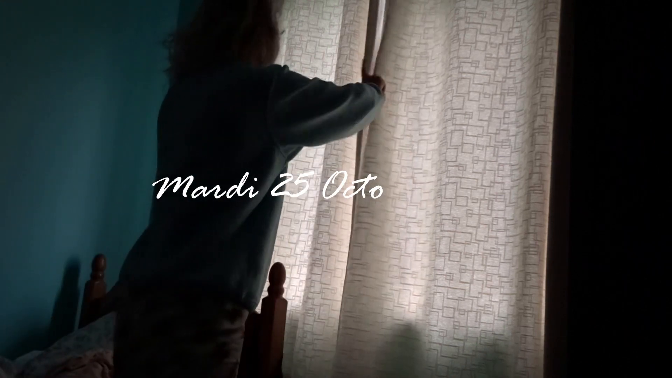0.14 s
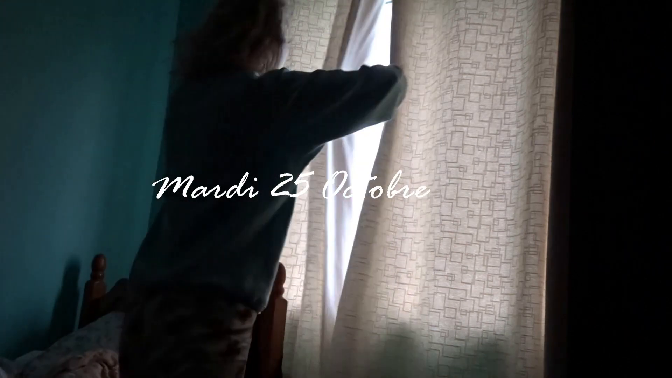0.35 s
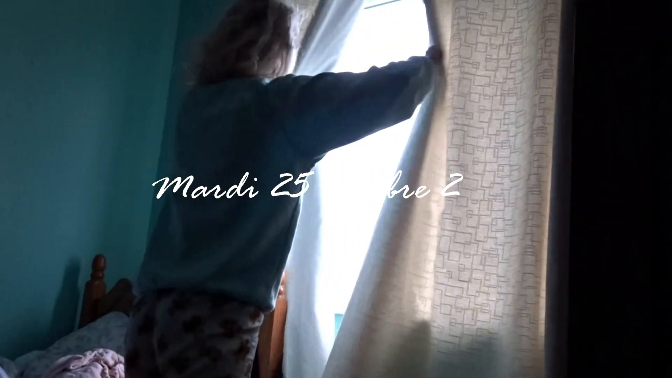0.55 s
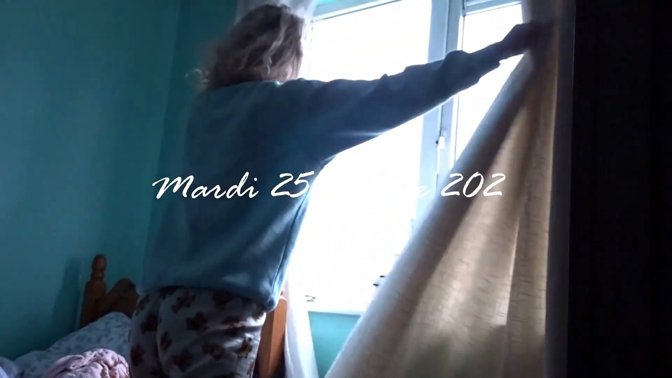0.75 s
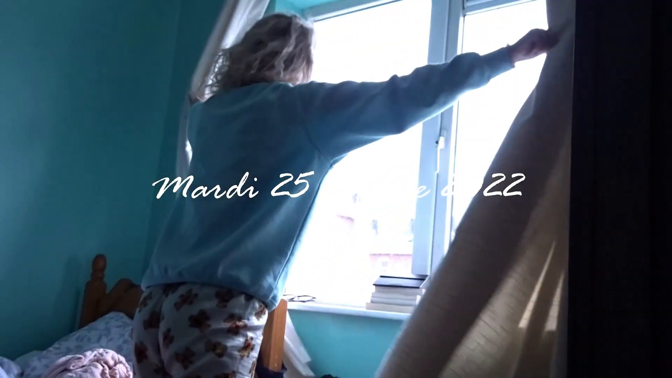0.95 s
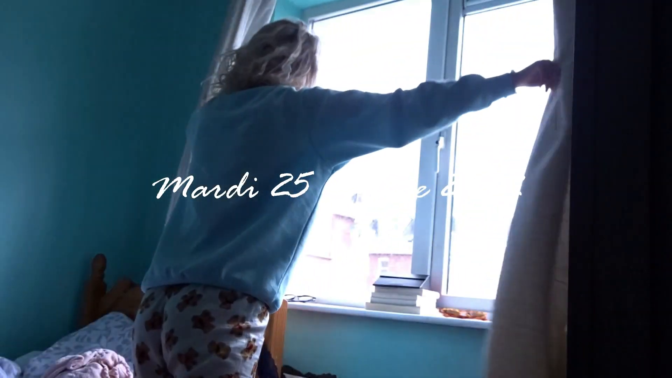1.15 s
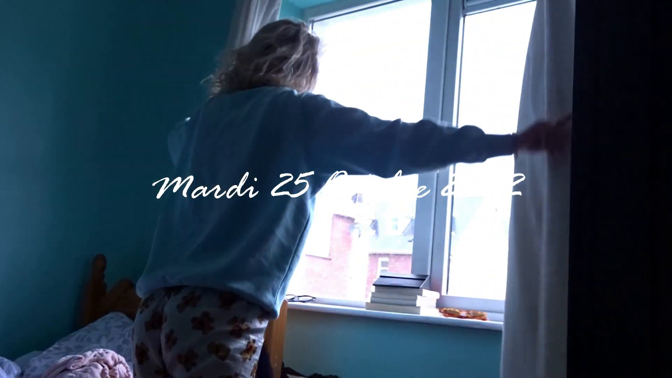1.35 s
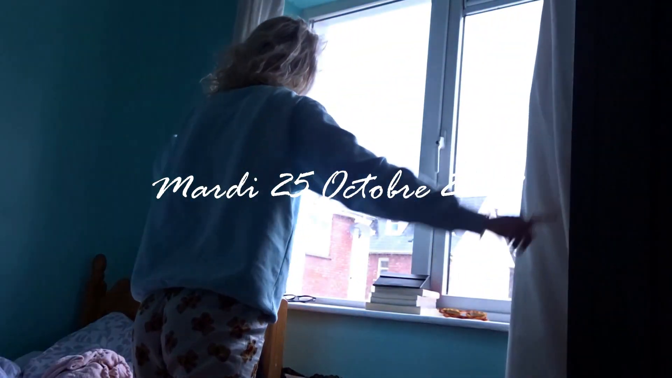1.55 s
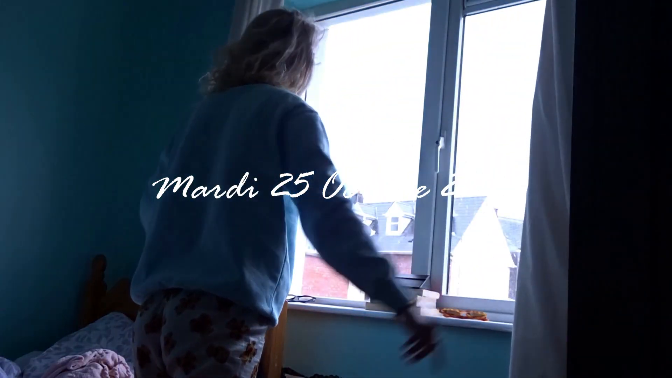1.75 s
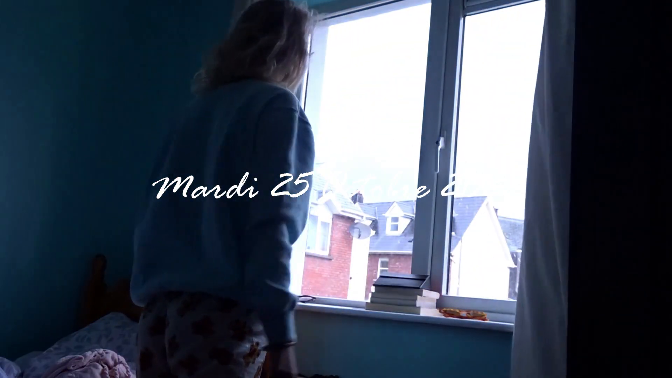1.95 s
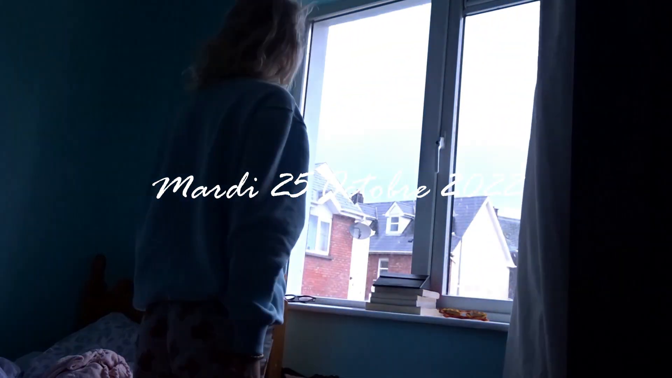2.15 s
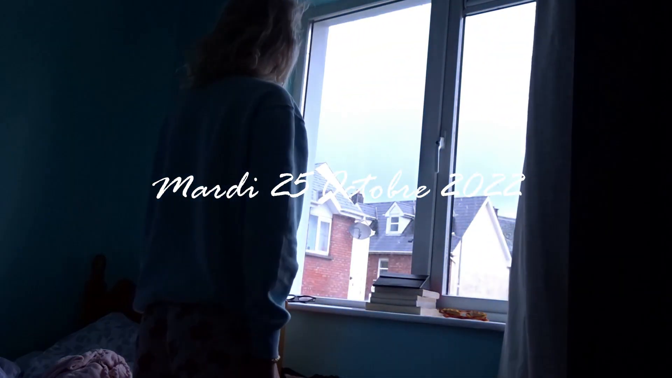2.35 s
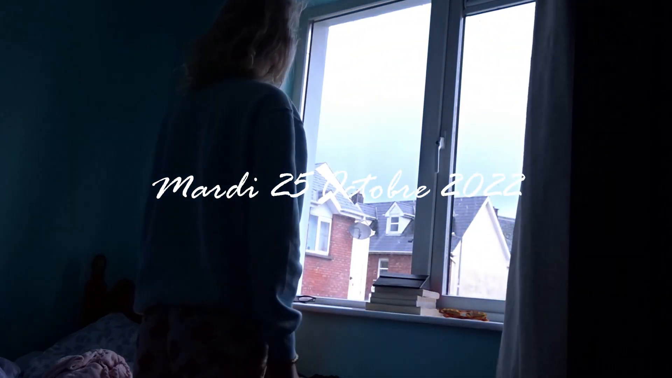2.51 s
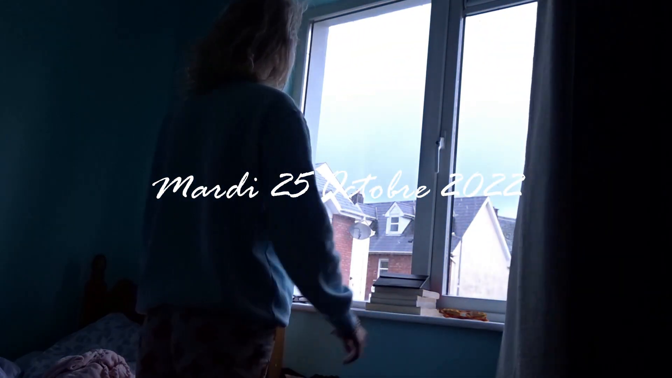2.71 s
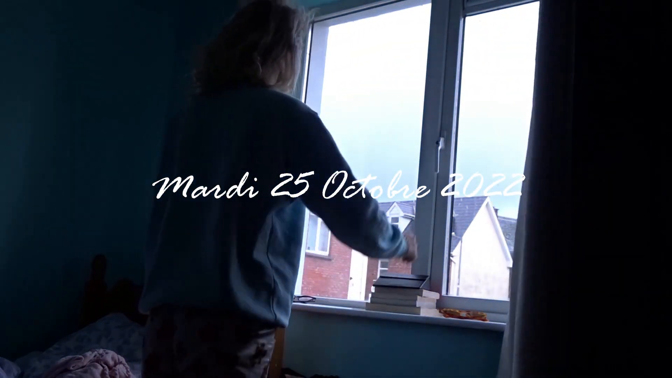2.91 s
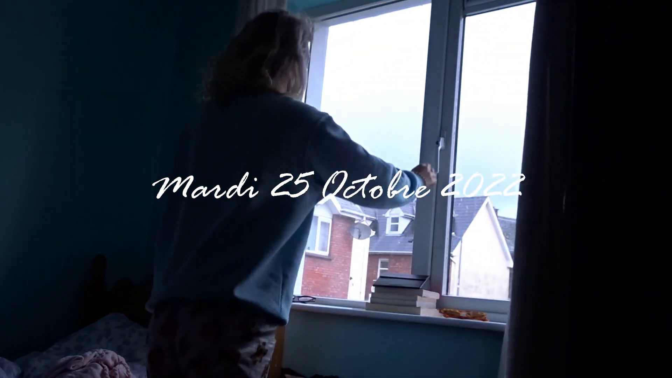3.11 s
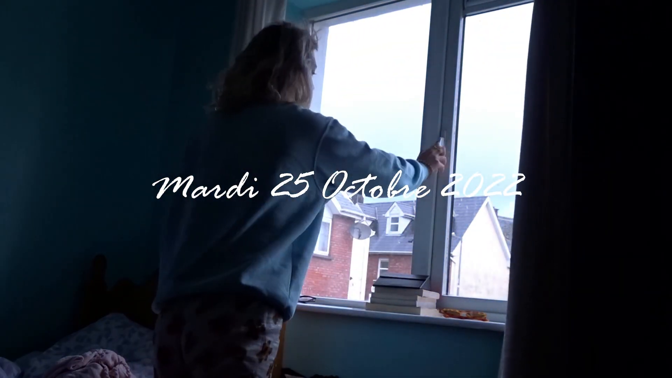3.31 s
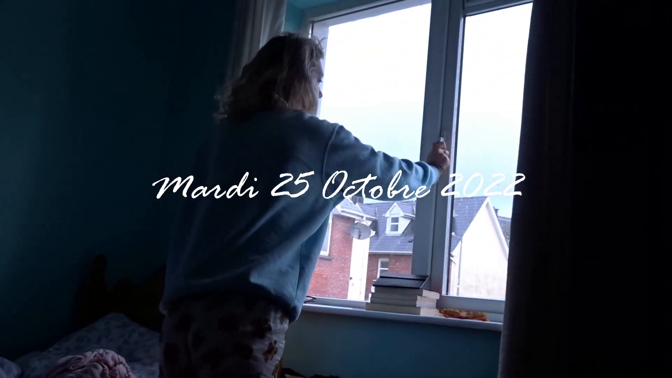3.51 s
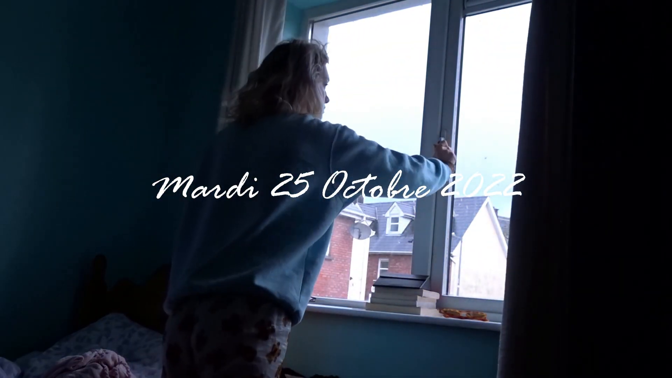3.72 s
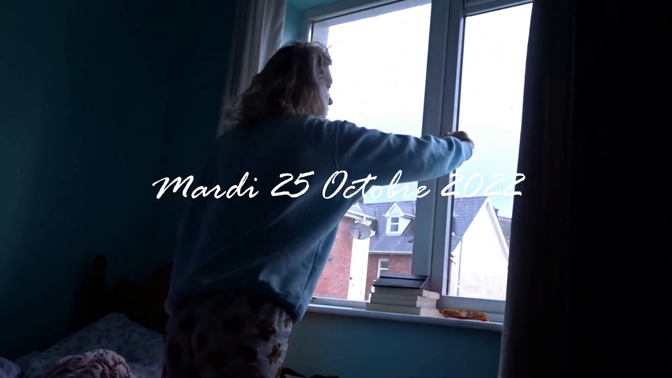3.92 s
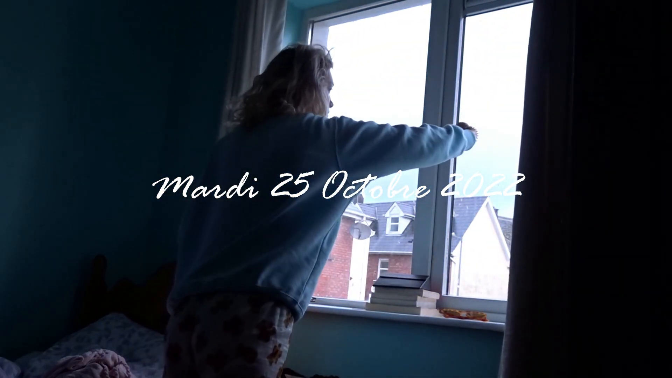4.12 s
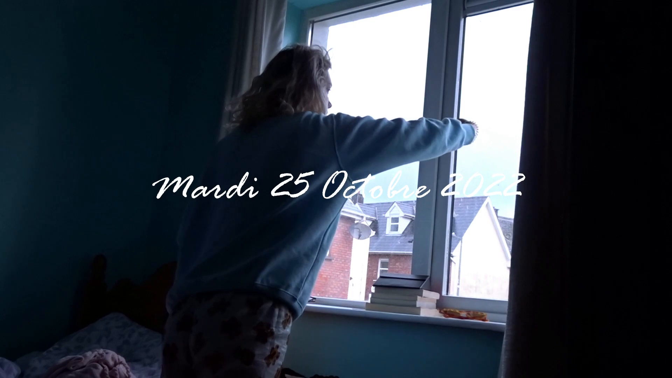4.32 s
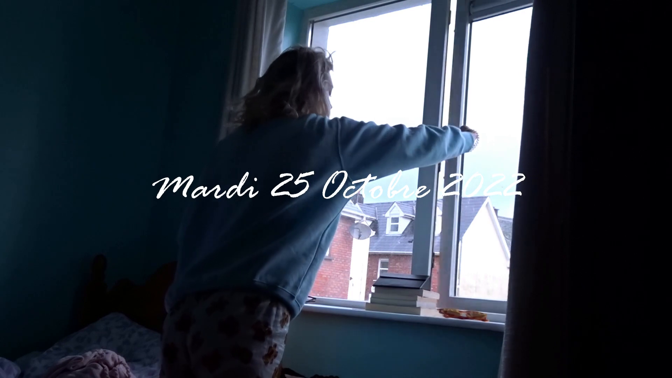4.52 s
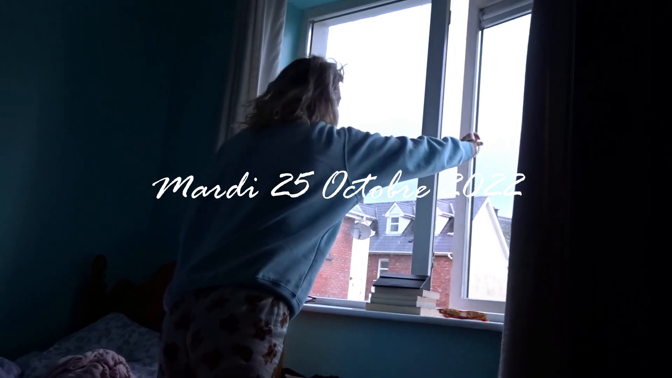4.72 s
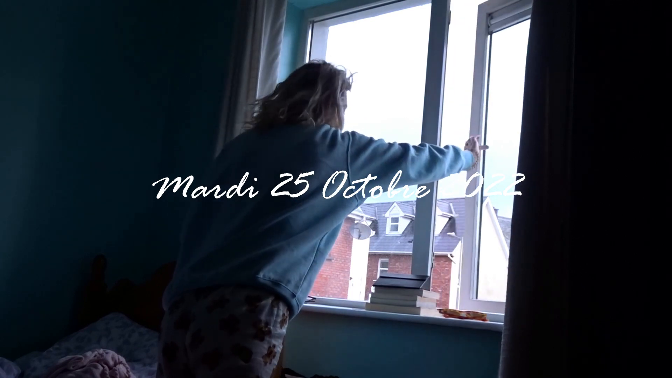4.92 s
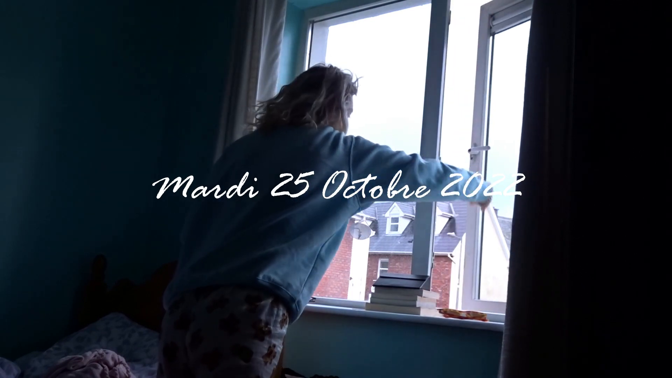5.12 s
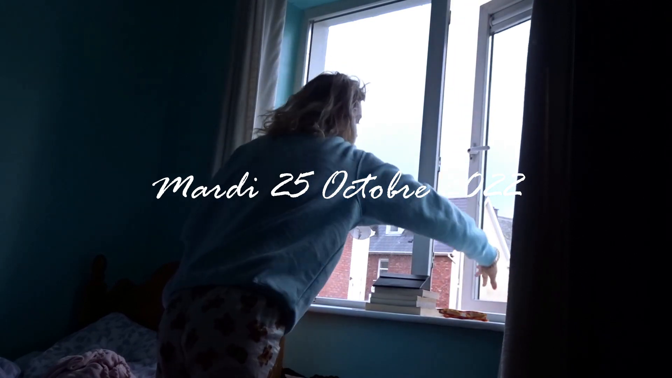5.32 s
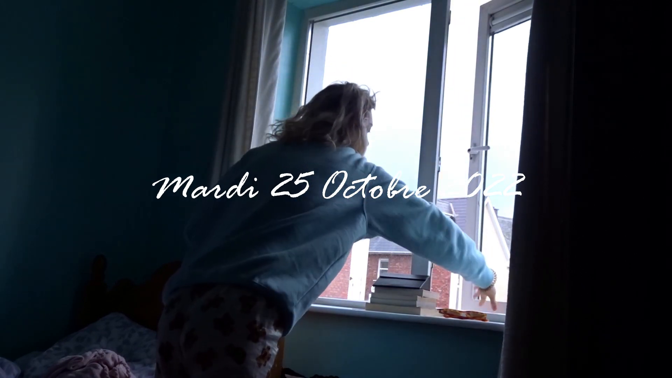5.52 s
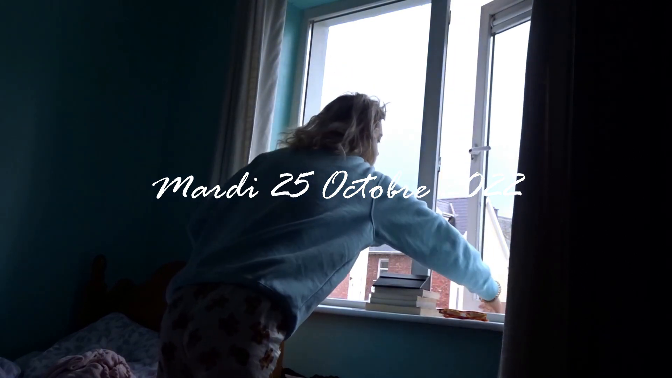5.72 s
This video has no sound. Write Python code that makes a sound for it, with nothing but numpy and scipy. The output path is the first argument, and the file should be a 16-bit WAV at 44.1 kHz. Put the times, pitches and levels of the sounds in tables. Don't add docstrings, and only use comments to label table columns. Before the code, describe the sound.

A brisk metallic rattle of curtains swept open in a quiet bedroom, followed by latch clacks, a frame thump and a short stay rasp.

```python
import sys
import numpy as np
from scipy import signal
from scipy.fft import rfft, irfft
from scipy.io import wavfile

SR = 44100
rng = np.random.default_rng(int(sys.argv[2]) if len(sys.argv) > 2 else 0)


def convert_level_to_amplitude(level_db):
    exponent = np.asarray(level_db, float) / 20
    return 10 ** exponent


def wav_out(sig):
    wavfile.write(sys.argv[1], SR, np.round(np.clip(np.atleast_2d(sig).T, -1, 1) * 32767).astype(np.int16))


N = 258110


def rms_one(x):
    return x / np.sqrt(np.mean(x ** 2) + 1e-20)


def in_time(rows):
    s, *columns = np.transpose(rows)
    return [np.interp(np.arange(N) / SR, s, column, -140, -140) for column in columns]


def follow(control_db, ref_db, db, share):
    return db + share * (control_db - ref_db)


def colour(x, points):
    hz, db = np.transpose(points)
    log_hz = np.log(np.maximum(np.fft.rfftfreq(4096, 1 / SR), 5))
    wide_hz = np.r_[hz[0] / 4, hz, hz[-1] * 4]
    wide_db = np.r_[db[0] - 50, db, db[-1] - 50]
    level_db = np.interp(log_hz, np.log(wide_hz), wide_db)
    cepstrum = irfft(np.log(convert_level_to_amplitude(level_db)))
    cepstrum[1:2048] *= 2
    cepstrum[2049:] = 0
    response = irfft(np.exp(rfft(cepstrum)))
    response = response / np.linalg.norm(response)
    return signal.oaconvolve(x, response.reshape([1] * (x.ndim - 1) + [-1]), axes=-1)[..., :N]


def split_filter(x, hz, kind):
    return signal.sosfilt(signal.butter(2, hz, kind, fs=SR, output="sos"), x)


def drift(rate):
    r = np.exp(-80 * np.pi * rate / SR)
    noise = rng.standard_normal(N // 40 + 2002)
    slow = rms_one(signal.lfilter([1], [1, -2 * r, r * r], noise)[2000:])
    return np.interp(np.arange(N) / 40, np.arange(len(slow)), slow)


def ring(x, hz, t60):
    r, w = convert_level_to_amplitude(-60 / (t60 * SR)), 2 * np.pi * hz / SR
    return signal.lfilter([0, np.sin(w)], [1, -2 * r * np.cos(w), r * r], x + 1e-18)


def grains(per_s, spread_db, clump_db):
    sizes = convert_level_to_amplitude(spread_db * np.minimum(rng.exponential(1, (2, N)), 2.8))
    sizes = sizes * rng.choice([-1, 1], (2, N))
    happens = rng.random((2, N)) < per_s / SR
    return rms_one(sizes * happens * convert_level_to_amplitude(clump_db * drift(62)))


def blows(rub, times, levels_db, t60s, first_db, rise=0.0018):
    out = np.zeros((2, N))
    for s, db, t60 in zip(times, levels_db, t60s):
        t60 = max(t60, 0.005)
        i, t = round(s * SR), np.arange(round(1.2 * t60 * SR)) / SR
        out[:, i:i + len(t)] += rub[:, i:i + len(t)] * convert_level_to_amplitude(db - 60 * t / t60) * (1 - np.exp(-t / rise))
        out[:, i] += convert_level_to_amplitude(db + first_db)
    return out


def pings(rows):
    out = np.zeros(N)
    for s, db, hz, t60 in rows:
        i, t = round(s * SR), np.arange(round(1.2 * t60 * SR)) / SR
        swell = 1 - np.exp(-t * hz / 1.2)
        out[i:i + len(t)] += convert_level_to_amplitude(db - 6.5 - 60 * t / t60) * np.sin(2 * np.pi * hz * t) * swell
    return out


def spread(mid, side, width):
    hz, db = np.transpose(width)
    grid = np.maximum(np.fft.rfftfreq(len(side), 1 / SR), 1)
    side_gain = convert_level_to_amplitude(np.interp(np.log(grid), np.log(hz), db))
    side = irfft(rfft(side) * side_gain, len(side))
    return np.array([mid + side, mid - side])


# time [s], level [dB].
STIR = [(0.0, -46), (0.192, -60.5), (0.4, -67), (1.25, -54), (1.44, -66), (1.59, -59.5), (1.66, -56),
        (1.85, -64.5), (2.01, -59), (2.48, -74.5), (2.7, -69.5), (2.87, -58.5), (3.0, -64), (3.27, -58),
        (4.2, -54), (4.8, -50.5), (5.116, -62), (5.85, -56)]
# time [s], level [dB].
STREET = [(0.0, -43), (0.2, -60), (1.3, -77), (1.44, -66.5), (1.72, -63.5), (2.6, -89), (2.87, -64.5),
          (3.05, -73.5), (3.3, -63.5), (4.2, -62), (4.75, -60), (5.0, -62.5), (5.334, -58), (5.49, -55.5),
          (5.55, -63), (5.7, -52), (5.85, -55)]
# time [s], level [dB].
AIR = [
    (0.0, 2),
    (1.4, 2.5),
    (1.72, -4),
    (2.0, -0.8),
    (3.1, 0.5),
    (4.8, 2.5),
    (5.85, -0.1),
]
# time [s], peak [dB], half length [s].
TREADS = [
    (0.03, -50.5, 0.22),
    (2.01, -63, 0.24),
    (3.27, -65, 0.12),
    (3.34, -51, 0.057),
    (4.046, -44.5, 0.06),
    (4.17, -48, 0.039),
    (4.75, -51, .1),
    (5.11, -60.5, 0.14),
]
# frequency [Hz], level [dB per Hz].
QUIET = [(12, -50.5), (20, -13.5), (107, -6), (233, 0.5), (397, -3.5), (570, 2), (674, -9), (969, -7),
         (1150, -11), (1690, -8.5), (6650, -17), (13700, -23), (15800, -30)]
HUM = [(150, -21.5), (225, -11), (265, -5), (320, -4), (370, -6.5), (430, -17.5), (600, -26)]
TREAD = [(25, -7), (60, -5.5), (125, 6.5), (190, -12.5)]
RUSTLE = [(240, -31), (400, -11.5), (697, -6), (953, -3.5), (1360, -13.5), (1710, -13.5), (12000, -34.5),
          (15600, -62)]
# frequency [Hz], side minus mid [dB].
DIFFUSE = [(60, -16), (150, -13), (380, -6), (950, -1), (2380, 0), (5980, 1), (15000, 0)]


def background():
    (rustle_db,), (hum_db,), (air_db,) = in_time(STIR), in_time(STREET), in_time(AIR)
    t = np.arange(N) / SR
    tread_db = np.max([db - 12 * np.abs(t - s) / half for s, db, half in TREADS], axis=0)
    air = convert_level_to_amplitude(-56.5 + air_db + 0.37 * drift(5)) * colour(rng.standard_normal((2, N)), QUIET)
    hum = convert_level_to_amplitude(hum_db + 4.0 + 0.89 * drift(9)) * colour(rng.standard_normal((2, N)), HUM)
    tread = convert_level_to_amplitude(tread_db - 4.0) * colour(rng.standard_normal((2, N)), TREAD)
    cloth = convert_level_to_amplitude(rustle_db - 1.5 + 1.2 * drift(12)) * colour(grains(6000, 0.88, 1.7), RUSTLE)
    return spread(*(air + hum + tread + cloth), DIFFUSE)


# start [s], peak [dB], pitch [Hz], t60 [s].
THUDS = [(0.988, -34.5, 239, 0.13), (1.014, -38, 260, 0.091), (1.019, -43, 127, 0.13),
         (1.25, -51, 301, 0.088), (2.031, -58, 128, 0.21), (3.243, -44, 236, .08), (3.47, -46, 250, 0.086),
         (3.522, -29, 255, 0.07), (3.61, -30, 118, 0.24), (3.664, -28.5, 115, .1), (3.68, -30, 290, .08),
         (3.697, -24.5, 200, .1), (3.738, -30, 129, 0.17), (3.793, -36, 260, .08), (3.83, -34, 236, .08),
         (3.945, -38, 128, 0.11), (4.329, -34, 220, .08), (4.377, -30, 110, 0.24), (4.388, -29, 260, 0.075),
         (4.429, -35.5, 57.4, 0.36), (4.5, -49, 59.6, 0.46), (4.521, -39, 120, 0.2), (4.594, -41, 290, .08),
         (4.648, -34.5, 304, .08), (4.66, -34.5, 75.6, 0.29), (5.718, -50, 240, 0.2)]


def thuds():
    out = np.zeros(N)
    for s, db, hz, t60 in THUDS:
        push, width, i = np.zeros(N), round(0.4 * SR / hz), round(s * SR)
        push[i:i + width] = convert_level_to_amplitude(db + 6.0) * np.hanning(width) * 2 / width
        out += ring(push, hz, t60)
    return out


# start [s], peak [dB], note [Hz], t60 [s].
CLICKS = [(3.083, -51, 897, 0.038), (3.188, -50.5, 2840, 0.034), (3.267, -53, 3200, .05),
          (3.468, -53, 4500, .03), (3.5225, -31, 3000, .02), (3.527, -27, 4500, .015),
          (3.5545, -11, 4300, .005), (3.556, -22, 1226, 0.055), (3.558, -17, 3000, .012),
          (3.564, -15, 4400, .006), (3.571, -19, 3000, .012), (3.576, -31, 1180, .05),
          (3.582, -20, 2900, .012), (3.672, -19.5, 843, 0.054), (3.686, -26, 640, 0.047),
          (3.698, -23, 906, 0.062), (3.81, -30.5, 3430, 0.033), (3.816, -34, 1410, .04),
          (3.839, -28, 6900, .012), (3.8425, -14, 6750, 0.0047), (3.848, -29, 3500, .03),
          (3.85, -31, 824, .05), (3.917, -35, 4820, .03), (3.958, -30, 796, 0.044), (4.28, -44, 6800, .015),
          (4.301, -33, 1010, 0.054), (4.322, -35, 6300, .02), (4.338, -28, 5970, .015),
          (4.338, -38, 8400, .012), (4.351, -32, 6500, .015), (4.351, -30, 1250, 0.037),
          (4.36, -22, 990, .06), (4.363, -28, 6400, .015), (4.363, -38, 12500, .012),
          (4.372, -18, 1580, 0.049), (4.375, -28, 3300, .02), (4.428, -36, 11500, .012),
          (4.43, -34, 3560, .02), (4.5, -37, 1690, .04), (4.545, -35, 882, 0.08), (4.553, -39, 1210, 0.09),
          (4.56, -35.5, 3180, .02), (4.588, -30, 864, .07), (4.641, -38, 1155, .05),
          (4.642, -37.5, 2586, 0.029), (4.658, -38, 880, 0.054)]


def window_clicks():
    return pings(CLICKS)


# frequency [Hz], level [dB per Hz].
FRAME = [(240, -41.5), (400, -2.5), (443, -8), (731, -11), (889, -5.5), (1060, -6), (1420, -8.5),
         (1540, -8.5), (1700, -11.5), (2400, -16.5), (3380, -58), (5720, -120)]
# frequency [Hz], level [dB], t60 [s].
HOLLOW = [(864, -30.5, 0.08), (1150, -27, 0.022)]


def frame(load_db, s, db, t60):
    wood = grains(2000, 3.5, 1.2)
    shake = wood * convert_level_to_amplitude(load_db - 11.0) + blows(wood, s, db - 16.5, t60, 8.1, rise=0.0042)
    hollow = sum(convert_level_to_amplitude(level_db) * ring(shake, hz, t) for hz, level_db, t in HOLLOW)
    return colour(shake, FRAME) + hollow


# start [s], peak [dB], t60 [s].
LURCHES = [(3.237, -40, 0.05), (3.28, -40, 0.3), (3.525, -25, 0.05), (3.556, -23, 0.15),
           (3.606, -16, 0.051), (3.667, -18.5, 0.37), (3.796, -24, 0.11), (3.922, -27, 0.089),
           (4.342, -20.5, 0.17), (4.37, -14, 0.076), (4.388, -15, 0.069), (4.655, -28, 0.077),
           (4.664, -30, 0.079)]
# frequency [Hz], level [dB per Hz].
SASH = [(12, -27), (20, 0.5), (81, -10.5), (119, -1), (184, -6), (222, 0.5), (327, -7), (380, -10),
        (520, -21), (880, -120)]


def sash(load_db, s, db, t60):
    heavy = grains(900, 3.0, 1.2)
    jolts = [s, db - 7, t60]
    low_s, low_db, low_t60 = np.c_[np.transpose(LURCHES), jolts]
    rumble = heavy * convert_level_to_amplitude(follow(load_db, -45, -44.5, 0.73) - 11.0)
    lurch = blows(heavy, low_s, low_db - 14.0, 0.74 * low_t60, 13.0, rise=0.0034)
    return colour(rumble + lurch, SASH)


# start [s], peak [dB].
SNAPS = [
    (2.038, -53.5),
    (3.556, -8),
    (3.607, -20),
    (3.84, -28),
    (4.322, -32),
    (4.35, -24.5),
    (4.363, -28),
    (4.428, -31),
    (4.792, -46),
]
# frequency [Hz], level [dB per Hz].
LATCH = [(1180, -19), (1900, -5), (2500, -6.5), (3300, -1.5), (3770, -4), (4400, -3.5), (5200, -8.5),
         (5900, -10), (6900, -14), (7600, -16), (8450, -19), (11000, -18), (14300, -38)]
HINGE = [(1500, -13), (2100, -4.5), (2600, -9.5), (3200, -3.5), (4100, -8.5), (4900, -13), (9000, -25.5)]
TIP = [(5500, -31), (7000, -2), (9400, -3.5), (12600, 0), (15800, -6)]


def metal(latch_db, s, metal_db, t60):
    steel = grains(3000, 4.0, 1.5)
    rasp = steel * convert_level_to_amplitude(latch_db - 14.0) + blows(steel, s, metal_db - 15.0, 1.21 * t60, 14)
    pushed = np.arange(N) / SR > 4.15
    out = colour(rasp * ~pushed, LATCH) + colour(rasp * pushed, HINGE)
    jolts = [s, metal_db - 8.5]
    edge_s, edge_db = np.c_[np.transpose(SNAPS), jolts]
    edge_rasp = steel * convert_level_to_amplitude(follow(latch_db, -45, -59, 0.52) - 10.5)
    snaps = blows(steel, edge_s, edge_db - 15.0, np.full(len(edge_s), 0.073 / 2), 7.0)
    return out + colour(edge_rasp + snaps, TIP)


# start [s], length [s], pitch [Hz], width [Hz], level [dB].
SQUEAKS = [
    (3.461, 0.03, 13800, 2500, -49),
    (4.424, 0.0064, 11400, 4000, -28.5),
    (4.853, 0.077, 12570, 505, -61.5),
    (4.906, 0.065, 12450, 600, -58.5),
]


def squeaks():
    hiss, t, out = rng.standard_normal((2, N)), np.arange(N) / SR, 0
    for s, length, hz, width, db in SQUEAKS:
        band = rms_one(ring(ring(hiss, hz, 1.5 / width), hz, 1.5 / width))
        out = out + convert_level_to_amplitude(db - 11.5) * band * np.sin(np.pi * np.clip((t - s) / length, 0, 1))
    return out


# time [s], load on the frame [dB], rasp of the latch or stay [dB].
UNLATCH = [
    (3.05, -75, -79.5),
    (3.196, -64, -64),
    (3.515, -60, -53.5),
    (3.6, -50, -40),
    (3.7, -31.5, -44),
    (3.756, -48, -50),
    (3.814, -36.5, -27),
    (3.928, -49.5, -43),
    (4.0, -50, -38.5),
]
PUSH = [
    (4.082, -58, -52),
    (4.276, -64, -57.5),
    (4.342, -40, -32),
    (4.44, -40, -73),
    (4.52, -50, -44),
    (4.56, -42, -44),
    (4.652, -49.5, -74),
    (4.75, -56.5, -66),
    (5.0, -62, -90),
]
# start [s], frame peak [dB], metal share [dB], t60 [s].
JOLTS = [(2.038, -43, -4, 0.12), (2.825, -35.5, -23.5, 0.088), (3.162, -43, -14, 0.12),
         (3.237, -40, -5, 0.045), (3.269, -41.5, -5, 0.092), (3.475, -46, -6, 0.055),
         (3.523, -24, 2.5, 0.13), (3.553, -15.5, 4, 0.17), (3.606, -30, 6, 0.04),
         (3.667, -15.5, -16, 0.093), (3.796, -22.5, -17, 0.094), (3.84, -20, -2.5, 0.1),
         (3.916, -20.5, -6, 0.084), (4.22, -34, -11, 0.26), (4.276, -36.5, 0, 0.14),
         (4.3, -24, -10.5, 0.58), (4.322, -29, -4, 0.073), (4.344, -16.5, -9, 0.28), (4.364, -18, 0, 0.033),
         (4.388, -35, -27, 0.12), (4.43, -24, -0.5, 0.034), (4.55, -29.5, -9.5, 0.23),
         (4.597, -28, -25, 0.12), (4.641, -24, -11.5, 0.11), (4.663, -41, -25, 0.092),
         (4.792, -50.5, 11, 0.074)]


def window():
    load_db, latch_db = in_time(UNLATCH + PUSH)
    s, db, metal_share, t60 = np.transpose(JOLTS)
    wooden = frame(load_db, s, db, t60) + sash(load_db, s, db, t60)
    return wooden + metal(latch_db, s, db + metal_share, t60) + squeaks()


# start [s], peak [dB], note [Hz], t60 [s].
TICKS = [(0.422, -36, 1000, 0.023), (0.435, -41, 516, .06), (0.455, -42, 520, .05), (0.511, -29, 8000, .03),
         (0.523, -26.5, 2385, 0.027), (0.578, -29, 7530, .015), (0.592, -25.5, 1093, 0.055),
         (0.607, -12.5, 2850, 0.014), (0.61, -21.5, 1086, .05), (0.623, -18.5, 2720, .015),
         (0.6755, -6, 3000, .004), (0.676, -8, 6230, 0.012), (0.678, -2, 2720, 0.0062),
         (0.678, -9, 7500, .01), (0.688, -10.5, 2800, 0.064), (0.716, -17, 2490, .02),
         (0.718, -20.5, 430, .06), (0.721, -5, 2430, .02), (0.726, -4, 2620, .012),
         (0.734, -8, 2540, 0.0065), (0.755, -19, 2720, 0.018), (0.78, -12, 3700, .015),
         (0.781, -16.5, 6360, .015), (0.811, -11.5, 5690, 0.039), (0.811, -15, 3910, 0.036),
         (0.822, -18, 1110, .05), (0.822, -16, 1530, 0.044), (0.835, -18, 990, .05),
         (0.84, -21, 860, 0.043), (0.871, -10, 4920, 0.01), (0.885, 4, 2740, 0.0062),
         (0.905, -23, 380, .06), (0.913, -16, 2500, .02), (0.972, -20, 1040, .02), (0.975, -25, 807, .06),
         (0.985, -20, 1100, .03), (1.005, -28, 826, .07), (1.012, -28, 407, 0.055),
         (1.09, -44.5, 1528, 0.039), (1.1, -41, 452, 0.054), (1.15, -46, 3040, 0.035),
         (1.187, -50, 602, 0.045), (1.205, -43, 1070, 0.064), (1.207, -46, 3050, .03),
         (1.22, -43, 1087, .05), (1.312, -49, 589, .12), (1.403, -40, 903, 0.028),
         (1.428, -43.5, 1076, 0.052), (1.49, -51, 2900, .04)]


def ring_ticks():
    return pings(TICKS)


# start [s], peak [dB], note [Hz], t60 [s].
KNOCKS = [(0.4044, -45, 2297, 0.094), (0.4224, -49, 2172, 0.13), (0.51, -13, 2842, 0.079),
          (0.538, -24, 2277, 0.47), (0.568, -20, 2984, 0.14), (0.5844, -27, 2777, 0.22),
          (0.607, -15, 2790, 0.046), (0.624, -19, 2737, 0.036), (0.653, -18.5, 2950, 0.054),
          (0.675, -4.5, 2706, 0.056), (0.6843, -2, 2706, 0.035), (0.712, -7, 2286, 0.12),
          (0.722, -6.5, 2386, 0.082), (0.752, -7.5, 2530, 0.11), (0.7785, -14, 2690, 0.067),
          (0.802, -17, 3893, 0.016), (0.8214, -15.5, 3036, 0.019), (0.8444, -17, 2530, 0.11),
          (0.8737, -10.5, 2620, 0.17), (0.883, -14, 2680, 0.053), (0.9026, -11.5, 2410, 0.11),
          (0.9563, -21, 2550, 0.024), (1.089, -53, 2990, 0.032), (1.148, -39.5, 2240, 0.12),
          (1.4146, -42, 2190, 0.064)]


def scrape_and_knocks(scrape_db):
    s, db, note_hz, t60 = np.transpose(KNOCKS)
    rub, fine = grains(4000, 3.5, 1.2), grains(8000, 3.0, 1.2)
    sizzle_db = follow(scrape_db, -30, -28.5, 1.1)
    bright_db = follow(scrape_db[(s * SR).astype(int)], -30, -4, 0.18)
    middle = rub * convert_level_to_amplitude(scrape_db - 1) + blows(rub, s, db - 17.5, t60, 2.4)
    top = fine * convert_level_to_amplitude(sizzle_db - 4.0) + blows(fine, s, db + bright_db - 10.5, 0.63 * t60, 10)
    notes = 0
    for start, peak, hz, decay in zip(s, db, note_hz, t60):
        notes = notes + ring(blows(rub, [start], [peak - 33], [decay], 10.0), hz, 0.0014)
    return middle, top, notes


# start [s], peak [dB], pitch [Hz], t60 [s], share of the note [dB].
CLACKS = [(0.423, -30.5, 603, 0.13, -19), (0.577, -36.5, 598, 0.37, -7), (0.721, -3, 593, 0.045, -27),
          (0.889, -11.5, 570, 0.089, -22.5), (0.972, -20, 970, 0.11, -15), (1.023, -38, 1067, 0.097, -12),
          (1.076, -27, 1075, 0.21, -27), (1.186, -33, 1150, 0.13, -27), (1.312, -53, 573, 0.1, -2.5),
          (1.403, -33.5, 598, 0.039, -20), (1.414, -35.5, 1050, 0.16, -22), (1.458, -38.5, 930, 0.073, -27),
          (1.631, -45, 1084, 0.18, -20.5)]


def clacks(rattle):
    hollow, edge = 0, 0
    for s, db, hz, t60, note_db in CLACKS:
        touch = blows(rattle, [s], [db - 13.0], [t60], 15.0, rise=0.00058)
        hollow = hollow + convert_level_to_amplitude(note_db) * ring(touch, hz, 0.051)
        edge = edge + convert_level_to_amplitude(-2.0) * touch
    return hollow, edge


PULL = [(0.36, -69.5, -2.5), (0.472, -50.5, -3.5), (0.57, -44.5, -3), (0.62, -40.5, 3), (0.668, -32.5, 6),
        (0.68, -28.5, -2.5), (0.71, -34, -0.3), (0.76, -33.5, -0.6), (0.795, -24.5, -1.4), (0.82, -23, -5),
        (0.85, -29, 0.75), (0.87, -31.5, -2), (0.93, -41.5, -3.7), (0.99, -52.5, -8), (1.14, -59, -2),
        (1.58, -78.5, -12.5)]
# frequency [Hz], level [dB], t60 [s].
POLE = [(598, -3, 0.035), (2450, -8.5, .04), (2790, -5, 0.022), (2200, -9.5, 0.027), (3700, -33.5, 0.6),
        (2800, -26, 0.39), (5620, 1, 0.014), (7400, 1, 0.011), (8200, 1, .007), (11400, 8.5, 0.002),
        (13000, 2.5, 0.0036), (8030, -30, 0.5)]
# frequency [Hz], level [dB per Hz].
SCRAPE = [(880, -39), (1500, -3), (1880, -4.5), (2350, 3), (2800, 3), (3350, -0.5), (4100, -11),
          (6500, -38), (11000, -120)]
SIZZLE = [(2650, -31), (3900, 3), (5640, -0.5), (6250, -3), (7450, -2), (8630, -0.5), (9390, -6),
          (11200, -7), (15100, -9), (15800, -30)]
SWING = [(150, -45), (250, -8), (463, -5.5), (900, -8), (1080, -3.5), (1170, -14), (1560, -4),
         (2500, -17.5), (3250, -44.5), (5500, -120)]
BOOM = [(35, -55), (60, -18), (188, -12), (228, -5), (392, -7.5), (422, -12.5), (592, -5), (695, -7.5),
        (1110, 1), (2000, -13.5), (2600, -41.5), (4400, -120)]


def curtain():
    scrape_db, glide_db = in_time(PULL)
    middle, top, notes = scrape_and_knocks(scrape_db)
    rattle = grains(2100, 3.5, 1.3)
    hollow, edge = clacks(rattle)
    modes = sum(convert_level_to_amplitude(db - 28.0) * ring(middle if hz < 5000 else top, hz, t) for hz, db, t in POLE)
    out = split_filter(modes + notes + hollow, 350, "high")
    smear_db = np.maximum(follow(scrape_db, -30, 0, 0.3), -12)
    out = out + colour(middle, SCRAPE) + colour(top * convert_level_to_amplitude(smear_db), SIZZLE)
    finest = split_filter(out, 9600, "high")
    out = split_filter(out, 9600, "low") - convert_level_to_amplitude(glide_db) * finest
    boom_db = np.roll(follow(scrape_db, -30, -32.5, 0.88), round(0.015 * SR))
    return out + colour(edge, SWING) + colour(rattle * convert_level_to_amplitude(boom_db - 0.5), BOOM)


# frequency [Hz], side minus mid [dB].
WIDTH = [(60, -24), (150, -23), (380, -14), (950, -9), (2380, -6), (5980, 0), (15000, 0)]


def bedroom(parts, left_db):
    lead, out = 400, 0
    t = (np.arange(SR // 2) - lead) / SR
    for x, side in zip(parts, (1, -1)):
        noise = rng.standard_normal((2, len(t))) * np.clip((t - 0.002) / 0.0053, 0, 1)
        dull = signal.lfilter([0.2], [1, -0.8], noise)
        tail = dull * convert_level_to_amplitude(-60 * t / 0.21) + (noise - dull) * convert_level_to_amplitude(-60 * t / 0.22)
        tail = convert_level_to_amplitude(1.5) * tail / np.linalg.norm(tail[0])
        tail[:, lead] = convert_level_to_amplitude(3.0), side * convert_level_to_amplitude(2.0)
        out = out + signal.oaconvolve(x[None], spread(*tail, WIDTH), axes=1)[:, lead:lead + N]
    return out * convert_level_to_amplitude([[left_db], [-left_db]])


def scene():
    ticks, clicks = ring_ticks(), window_clicks()
    direct = convert_level_to_amplitude(3.0) * (ticks * convert_level_to_amplitude([[-0.5], [0.5]]) + clicks)
    curtain_room = bedroom(curtain() + convert_level_to_amplitude(-4.5) * ticks, -0.2)
    window_room = bedroom(window() + convert_level_to_amplitude(-4.5) * clicks, 0.1)
    return direct + curtain_room + window_room + thuds() + background()


def band_limit(x):
    return signal.sosfilt(signal.butter(12, 16860, fs=SR, output="sos"), x)


def record(dry):
    top_cut = signal.cheby2(20, 70, 16200, fs=SR, output="sos")
    ceiling = 0.85
    level = convert_level_to_amplitude(-2.8) * dry
    rounded = level / (1 + (np.abs(level) / ceiling) ** 4) ** 0.25
    return band_limit(signal.sosfilt(top_cut, rounded))


dry = scene()
out = record(dry)
wav_out(out)
```